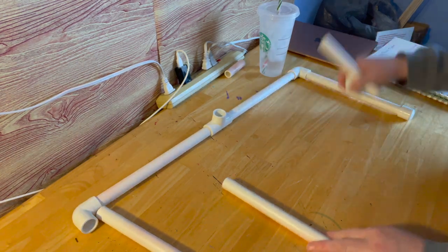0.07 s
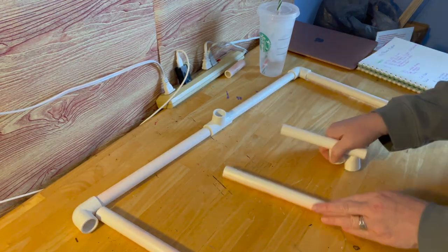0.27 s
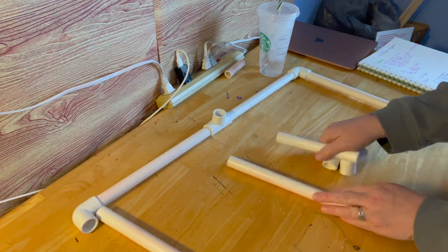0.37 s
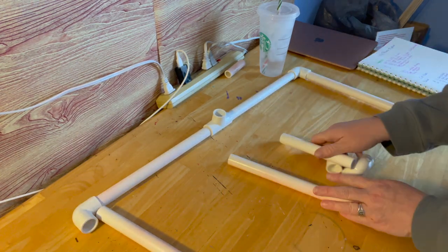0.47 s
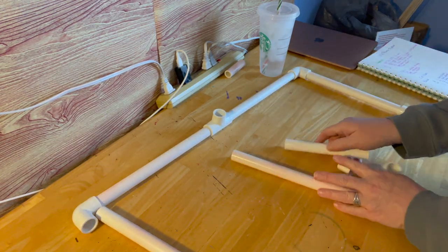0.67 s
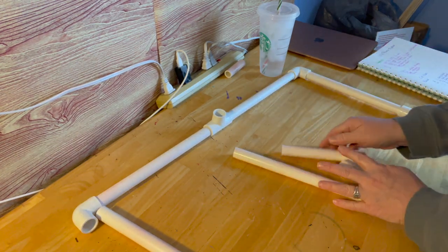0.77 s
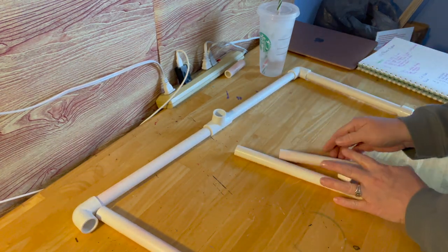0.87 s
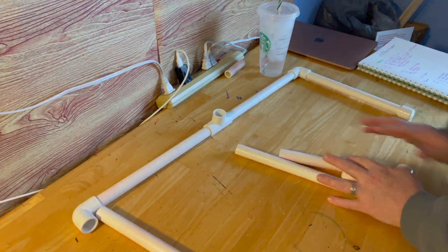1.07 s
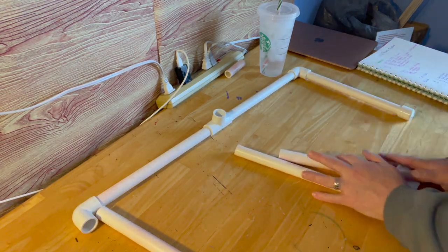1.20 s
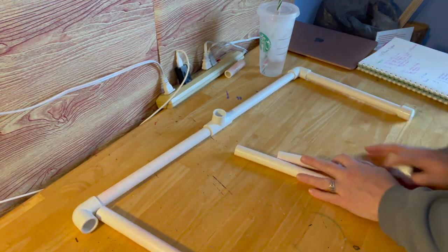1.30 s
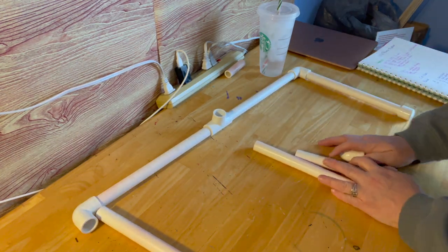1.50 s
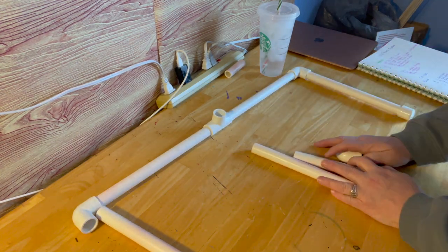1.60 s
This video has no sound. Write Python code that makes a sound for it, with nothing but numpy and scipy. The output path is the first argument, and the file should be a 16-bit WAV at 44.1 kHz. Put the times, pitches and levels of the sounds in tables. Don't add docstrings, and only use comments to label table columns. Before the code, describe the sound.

Hard plastic tubes clatter onto a wooden table in two bursts, then scrape and judder briefly

```python
import sys
import numpy as np
from scipy import signal
from scipy.fft import rfft, irfft, next_fast_len
from scipy.io import wavfile

SR = 44100
rng = np.random.default_rng(int(sys.argv[2]) if len(sys.argv) > 2 else 0)


def ratio_of_db(decibels):
    return 10 ** (np.asarray(decibels, float) / 20)


def inscribe(sig):
    pcm = np.round(np.clip(np.atleast_2d(sig).T, -1, 1) * 32767)
    wavfile.write(sys.argv[1], SR, pcm.astype(np.int16))


N = 72765

# start in seconds, peak level in dB, level of the pipe's bending ring in dB,
# tilt in dB per octave, favoured mode in Hz.
PIPE_KNOCKS = [(0.011, -32, -14, 15, 1288), (0.112, -33, -23, -18.5, 325), (0.2288, 2, -5, 2.5, 1274),
               (0.2335, -7.5, 10, -4.5, 743), (0.242, -12, -13, -7.5, 471), (0.255, -14.5, -7, -11.5, 560),
               (0.323, -16.5, 0, -6, 1200), (0.3598, -2, 4, 3.5, 575), (0.384, -15, 5.5, 5, 575),
               (0.41, -8.5, -11, -2.5, 1110), (0.418, -12.5, -1.5, 1.5, 471), (0.469, -18, -1.5, -3, 550),
               (0.52, -7.5, -1, -2, 626), (0.525, -7.5, -3, -1, 1288), (0.549, -6.5, -3, 2.5, 1288),
               (0.677, -23.5, -4, -7.5, 610), (0.738, -10.5, -6, 2, 765), (0.7731, -7, -9, 2, 575),
               (0.7836, -5, -0.5, 2.5, 471), (0.797, -13, -9, -7.5, 400), (0.809, -15, -3.5, 3.5, 677),
               (0.814, -14, -2, 3, 743), (0.828, -11.5, -1, 7, 1200), (0.836, -17.5, 1.5, 1.5, 743),
               (0.848, -15, -2.5, 0, 1200), (0.869, -13, -6, -3.5, 743), (0.875, -19.5, -6.5, 8, 677),
               (0.888, -14, -6, -1, 755), (0.901, -20.5, -9, -1.5, 1200), (0.908, -20, -1.5, -6.5, 560),
               (0.983, -33, -8, -7.5, 500), (1.02, -26.5, -4.5, -4, 400), (1.153, -26, -2, -0.5, 1180),
               (1.1648, -9, 0.5, 6.5, 575), (1.172, -14.5, -13, 3, 575), (1.193, -19.5, 2.5, 1.5, 700),
               (1.374, -14, -0.5, 4.5, 1288)]
# start in seconds, peak level in dB.
TABLE_THUMPS = [(0.092, -42.5), (0.23, -24.5), (0.364, -26.5), (0.415, -28), (0.526, -32.5), (0.664, -52.5),
                (0.79, -27), (0.887, -38), (1.162, -37), (1.373, -50), (1.468, -47), (1.617, -60)]
# start in seconds, peak level in dB, level of the upper wall modes in dB,
# favoured wall mode in Hz.
PIPE_CLACKS = [(0.229, -18, 0, 2130), (0.323, -12, -12, 3980), (0.353, -22, -25, 4140),
               (0.3608, -19.5, 0.5, 3000), (0.3768, -7.5, -6.5, 2550), (0.388, -23, -13, 3980),
               (0.4097, -15.5, -6, 2517), (.518, -26, -15, 4850), (0.5258, -29, -11, 2550),
               (.549, -28.5, -11.5, 4850), (0.7011, -16, -17.5, 3800), (0.741, -14, -16, 3830),
               (0.7727, -22, -6.5, 2130), (0.7846, -1.5, -12.5, 2713), (0.8095, -31.5, -4.5, 2130),
               (0.814, -20.5, -2.5, 2550), (0.826, -5.5, -11, 2598), (0.8311, -3.5, -30, 1747),
               (0.961, -25.5, -28, 2660), (1.165, -40, 3, 2130), (1.1979, -17, -13.5, 2630),
               (1.2075, -21, -21.5, 2070), (1.266, -26.5, -22.5, 2690), (1.374, -39, -2.5, 2130)]
# start in seconds, peak level in dB, tilt in dB per octave.
CATCHES = [
    (1.228, -24, -15),
    (1.288, -19, -3),
    (1.315, -19.5, 2),
    (1.333, -20, -5),
    (1.343, -11.5, -12.5),
    (1.366, -17, -3),
    (1.374, -20.5, 0),
    (1.435, -26, 4),
    (1.452, -27, -2),
]
# time in seconds, level in dB, grit level in dB, tilt in dB per octave.
SLIDE_PRESSURE = [(0, -33, -16, -2.5), (0.101, -40.5, -16.5, -8.5), (0.202, -48.5, -7, -25),
                  (0.222, -29.5, -20.5, -4.5), (0.4, -29, -11.5, 0.5), (0.498, -32.5, -16.5, -12.5),
                  (.63, -37, -26.5, -14), (.68, -32, -35, 3.5), (0.849, -22, -12.5, -0.5),
                  (0.951, -37, -18.5, -13.5), (1.132, -83, 13, 1), (1.159, -36, -45.5, 6.5),
                  (1.23, -35, -17.5, 5.5), (1.301, -30, -20, 11.5), (1.379, -30.5, -17, -2.5),
                  (1.449, -33.5, -14, 3.5), (1.52, -45.5, -10.5, -12.5), (1.65, -77.5, -18.5, 4.5)]

# frequency in Hz, level in dB, time to fade by 60 dB in seconds.
BODY_MODES = [(325, -14, 0.043), (393.5, -9.5, 0.069), (471, -4.5, 0.043), (575, -4, 0.04),
              (677, -4, 0.049), (743, -5, 0.044), (1110, -6.5, 0.051), (1200, 0.5, 0.019),
              (1288, -4.5, 0.038), (1613, -5, 0.031), (2060, -9.5, 0.016)]
BENDING_MODES = [(934.4, -4, 0.088), (978.4, 0.5, 0.029), (1678, -21, 0.057)]
WALL_MODES = [(2130, 9.5, 0.01), (2550, 5, 0.015), (2660, 2.5, 0.014), (3000, 2.5, 0.024),
              (3547, 3.5, 0.014), (3970, -6, 0.027), (4207, -4.5, 0.01), (4850, -5, 0.016)]
UPPER_WALL_MODES = [(6350, 6, 0.0063), (7270, 4.5, 0.0095), (7620, -6.5, 0.013), (7560, -3.5, 0.036),
                    (9120, 1, 0.0064), (11400, -18, .005), (14500, -6, .005)]
THUMP_MODES = [(85, 10.5, 0.17), (119.7, 14.5, 0.19), (158.3, 9, 0.12), (198, 10.5, 0.054), (283, 5, 0.093)]
JUDDER_MODES = [(745, 0, .045), (925, -9, .04), (1295, -2, .045), (1625, -12, .03)]

# frequency in Hz, width in Hz, level in dB.
SLIDE_MODES = [(350, 140, -33), (392.4, 140, -6), (544, 20, -6), (700, 180, -0.5), (741, 80, -2.5),
               (976, 43, -6), (1150, 35, -8.5), (1261, 100, -5.5), (1743, 240, -23), (2130, 340, -29.5)]
# frequency in Hz, level in dB per Hz.
GRIT_COLOUR = [(1800, -1.5), (3000, -12.5), (6000, -17), (8500, -15.5), (11000, -25.5), (16000, -28)]
# frequency in Hz, level in dB per Hz.
RUMBLE_COLOUR = [(25, -16), (60, 6), (110, 5.5), (200, -5.5), (400, -19.5)]
# frequency in Hz, time to fade by 60 dB in seconds.
ROOM_T60 = [(100, 0.32), (500, 0.33), (2000, 0.28), (6000, 0.13), (14000, 0.053)]
# frequency in Hz, radians by which the left lags.
PORT_LAG = [(200, 0), (1800, 1.4), (3000, 1.4), (6200, .6), (7600, .4), (11500, np.pi), (15500, 2 * np.pi)]

SIDES = np.array([[1], [-1]])
APART, APART_HZ = 0.53, (230, 6100)
SPREAD_DB, RING_SPREAD_DB = 3.0, 1.5
TOUCH_LOSS_DB = 9
CONTACT_HZ = 2650


def at_hz(points, hz):
    table_hz, values = np.transpose(points)
    return np.interp(np.log(hz + 1e-9), np.log(table_hz), values)


def rms_one(x):
    return x / np.sqrt(np.mean(x ** 2) + 1e-20)


def shaped(x, gain):
    size = next_fast_len(N + SR)
    hz = np.arange(size // 2 + 1) * SR / size
    return irfft(rfft(x, size) * gain(hz), size)[..., :N]


def band(x, low_hz, high_hz):
    return signal.sosfilt(signal.butter(2, [low_hz, high_hz], "band", fs=SR, output="sos"), x)


def unlike(hz):
    return 1 / (1 + (APART_HZ[0] / (hz + 1e-9)) ** 4) / (1 + (hz / APART_HZ[1]) ** 12)


def tilted(tilt_db):
    return lambda hz: tilt_db * np.log2(hz / 800)


def bump(hz, best_hz, octaves):
    return np.exp(-(np.log2(hz / best_hz) / octaves) ** 2)


def ring(clicks, hz, t60):
    decay = ratio_of_db(-60 / (max(t60, .003) * SR))
    turn = 2 * np.pi * hz / SR
    return signal.lfilter([0, np.sin(turn)], [1, -2 * decay * np.cos(turn), decay * decay], clicks + 1e-18)


def strike(s, db, colour, modes, spread_db, chatter_s, count=3):
    touch = np.arange(count)
    late = rng.random((len(s), count)) * chatter_s * (touch > 0)
    at = np.minimum(((s[:, None] + late) * SR).astype(int), N - 1)
    chance, aim = rng.standard_normal((2, len(s), count, len(modes)))
    out = 0
    for k, (hz, level_db, t60) in enumerate(modes):
        mid, side = np.zeros((2, N))
        touch_db = (db + colour(hz))[:, None] - TOUCH_LOSS_DB * touch
        size = ratio_of_db(touch_db + level_db + spread_db * chance[:, :, k])
        np.add.at(mid, at, size)
        np.add.at(side, at, size * APART * unlike(hz) * aim[:, :, k])
        out = out + (-1) ** k * ring(mid + SIDES * side, hz, t60)
    return out


def puff(s, db, decay_s, low_hz, high_hz):
    since = np.arange(N) / SR - s[:, None]
    burst = ratio_of_db(db) @ ((since >= 0) * np.exp(-np.abs(since) / decay_s))
    return band(burst * rng.standard_normal(N), low_hz, high_hz)


def room(x):
    t, echo = np.arange(SR // 2) / SR, 0
    white = rng.standard_normal((2, 2, len(t))) * (t > 0.0026)
    for k, low_hz in enumerate(240 * 2 ** np.arange(0, 6, .5)):
        mid, side = band(white[k % 2], low_hz, low_hz * 2 ** .5)
        t60 = max(at_hz(ROOM_T60, low_hz), .03)
        both = mid + unlike(low_hz * 1.2) * side * SIDES
        echo = echo + both * ratio_of_db(-60 * t / t60) / np.sqrt(t60 * SR / 7)
    return signal.fftconvolve(x[None], echo)[:, :N]


def slide_pressure():
    s, *columns = np.transpose(SLIDE_PRESSURE)
    return [np.interp(np.arange(N) / SR, s, column) for column in columns]


def rumble():
    db, _, _ = slide_pressure()
    colour = lambda hz: ratio_of_db(at_hz(RUMBLE_COLOUR, hz)) * (hz > 20) / (1 + (hz / 400) ** 4)
    low = shaped(rng.standard_normal(N), colour)
    return ratio_of_db(-43.5 + 0.77 * (db - db.mean())) * rms_one(low)


def grit():
    db, grit_db, _ = slide_pressure()
    mid, side = rng.standard_normal((2, N))
    noise = mid + SIDES * shaped(side, unlike)
    hiss = shaped(noise, lambda hz: ratio_of_db(at_hz(GRIT_COLOUR, hz)) * (hz > 1500))
    return ratio_of_db(db + grit_db) * rms_one(hiss)


def rubbing():
    slips_per_s, slip_spread_db = 690, 2
    db, _, tilt_db = slide_pressure()
    out = 0
    for hz, width_hz, level_db in SLIDE_MODES:
        happens = rng.random(N) < slips_per_s / SR
        strength = rng.standard_normal(N) * ratio_of_db(slip_spread_db * np.minimum(rng.exponential(1, N), 4))
        tone = rms_one(ring(happens * strength, hz, 2.2 / width_hz))
        out = out + ratio_of_db(level_db - 6 + tilt_db * np.log2(hz / 750)) * tone
    return ratio_of_db(db) * signal.lfilter(*signal.butter(2, 320, "high", fs=SR), out)


def catches():
    s, db, tilt_db = np.transpose(CATCHES)
    hits = strike(s, db - 3, tilted(tilt_db), JUDDER_MODES, RING_SPREAD_DB, 0.00885)
    return signal.lfilter(*signal.butter(2, CONTACT_HZ, fs=SR), hits)


def thumps():
    s, db = np.transpose(TABLE_THUMPS)
    swings = strike(s, db - 1.5, tilted(0), THUMP_MODES, RING_SPREAD_DB, 0, count=1)
    return signal.lfilter(*signal.butter(2, 330, fs=SR), swings)


def clacks():
    s, db, upper_db, best_hz = np.transpose(PIPE_CLACKS)
    favoured = lambda hz: 15 * (bump(hz, best_hz, .08) + bump(hz, best_hz * 1.6, .08))
    walls = strike(s, db - 21, favoured, WALL_MODES, SPREAD_DB, 0.0033)
    upper = strike(s, db + upper_db - 13.5, tilted(0), UPPER_WALL_MODES, SPREAD_DB, 0.0043)
    crack = puff(s, db + upper_db - 4, 0.0046, 1700, 9650)
    return walls + upper + crack


def knocks():
    s, db, bend_db, tilt_db, best_hz = np.transpose(PIPE_KNOCKS)
    colour = lambda hz: tilted(tilt_db)(hz) + 6 * bump(hz, best_hz, 0.12)
    body = strike(s, db - 10.0, colour, BODY_MODES, SPREAD_DB, 0.00311, count=2)
    bending = strike(s, db + bend_db - 6.5, tilted(0), BENDING_MODES, RING_SPREAD_DB, 0, count=1)
    wood = puff(s, db + .5 * tilt_db - 5, 0.0076, 710, 2270)
    return signal.lfilter(*signal.butter(2, CONTACT_HZ, fs=SR), body + bending + wood)


def scene():
    direct = rubbing() + catches() + clacks() + knocks()
    echoes = ratio_of_db(-2) * room(direct.mean(axis=0))
    heard = rumble() + grit() + thumps() + echoes + direct
    lag_hz, lag = np.transpose(PORT_LAG)
    return shaped(heard, lambda hz: np.exp(-.5j * SIDES * np.interp(hz, lag_hz, lag)))


def roll_off(x):
    return signal.sosfilt(signal.butter(12, 16620, fs=SR, output="sos"), x)


def record(dry):
    x = shaped(dry, lambda hz: hz ** 2 / (hz ** 2 + 60 ** 2) / (1 + (hz / 16000) ** 60))
    mix = 1.071 * np.tanh(x / 1.27)
    return roll_off(mix)


dry = scene()
out = record(dry)
inscribe(out)
```